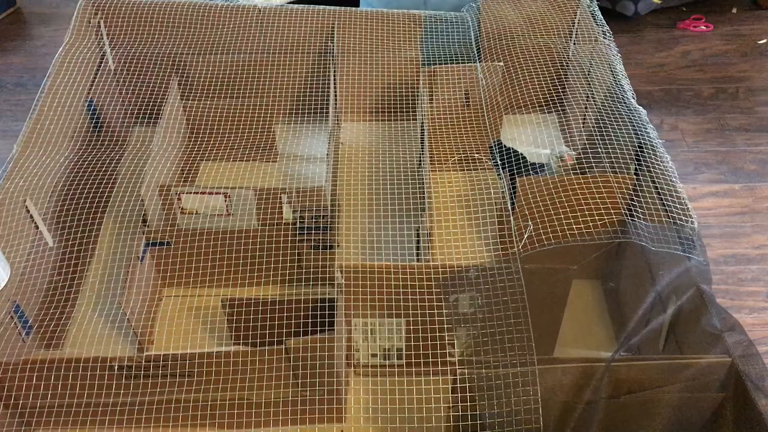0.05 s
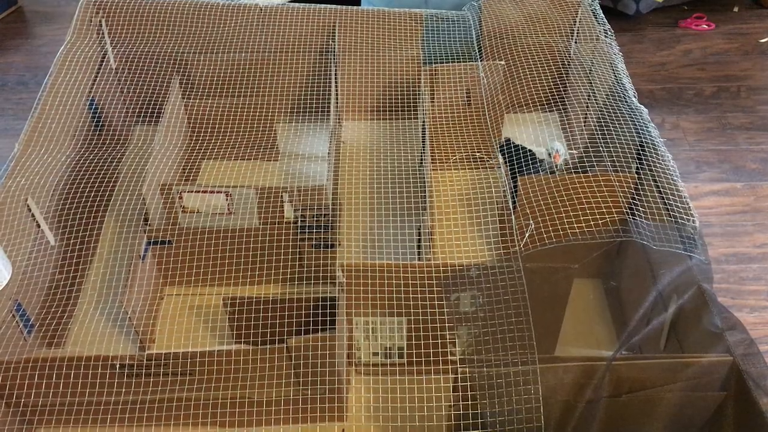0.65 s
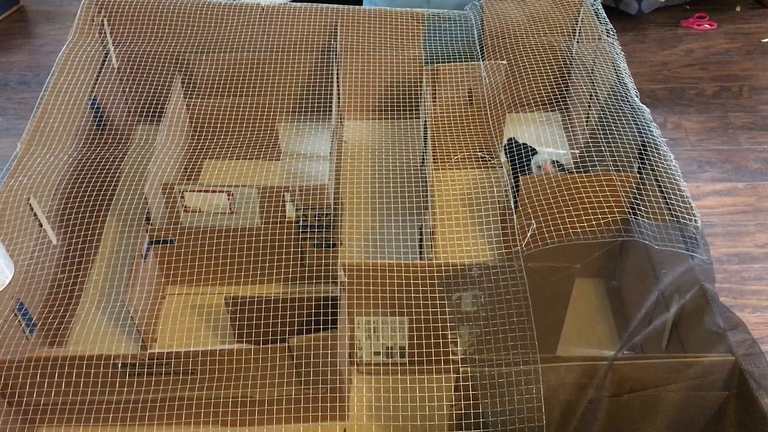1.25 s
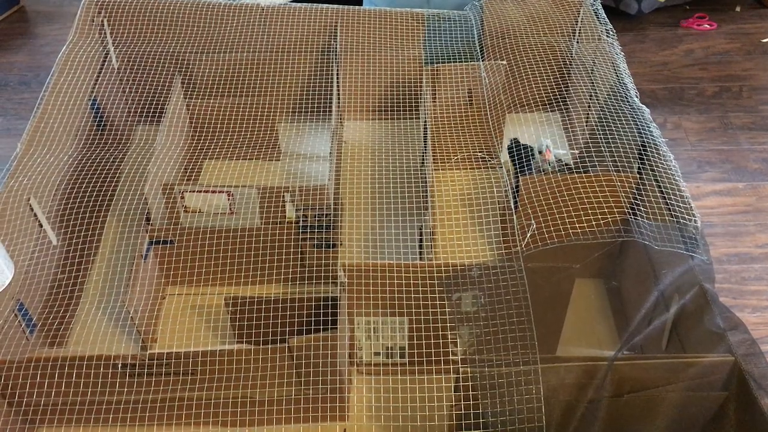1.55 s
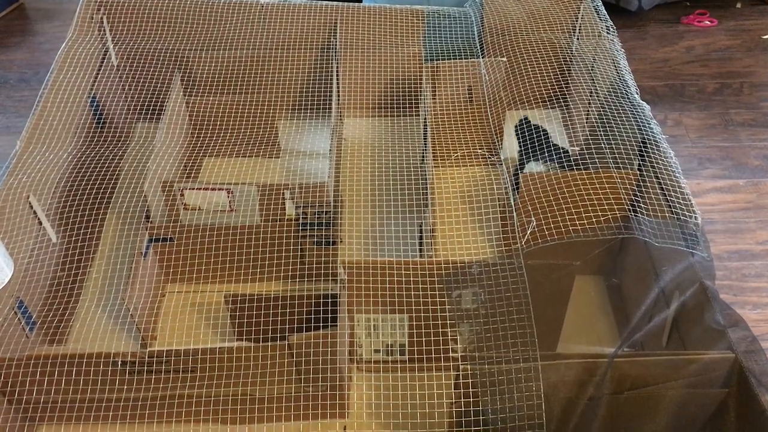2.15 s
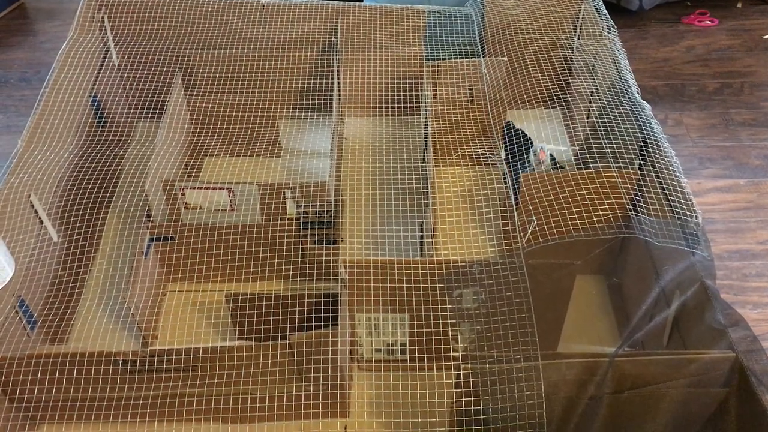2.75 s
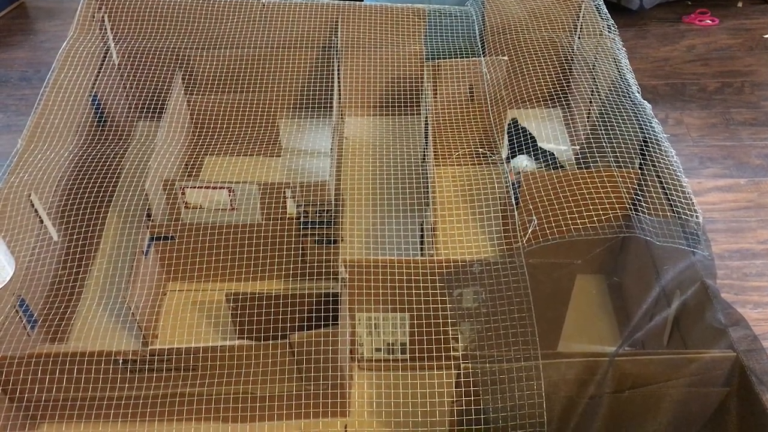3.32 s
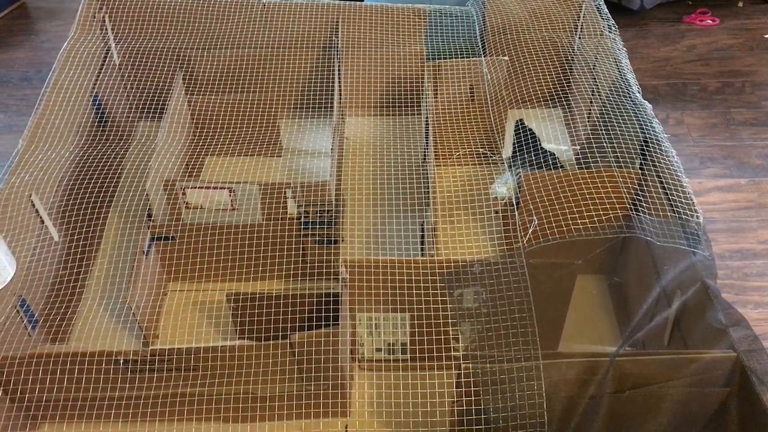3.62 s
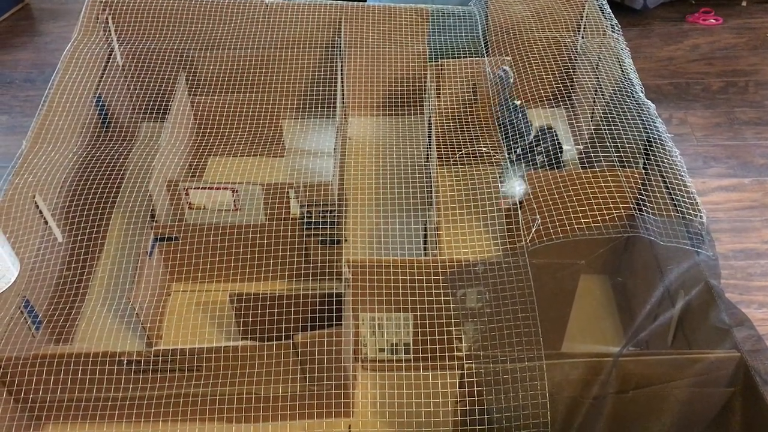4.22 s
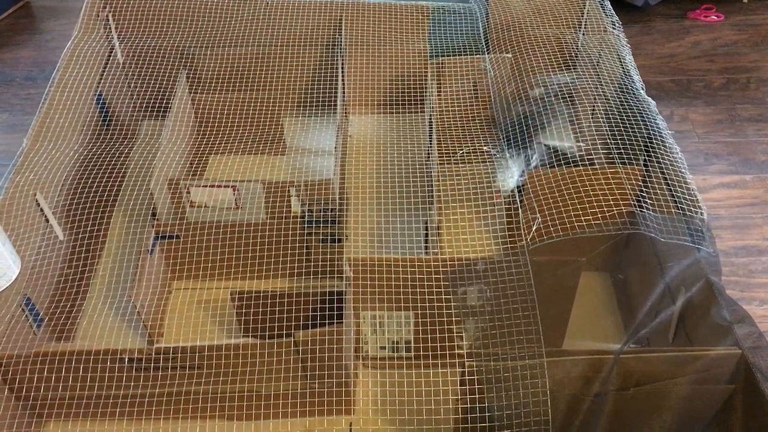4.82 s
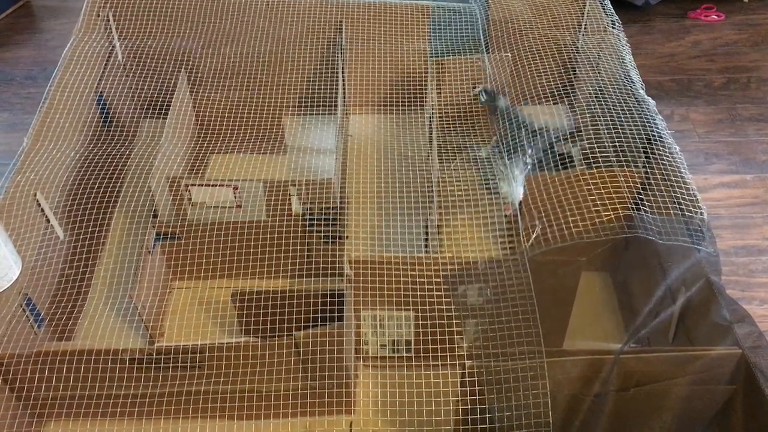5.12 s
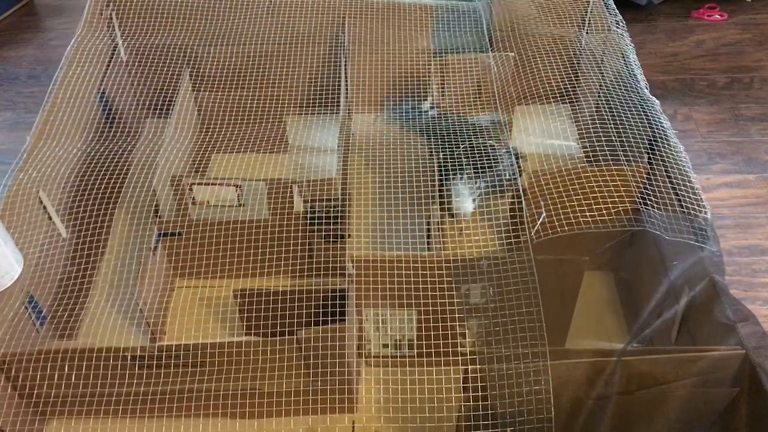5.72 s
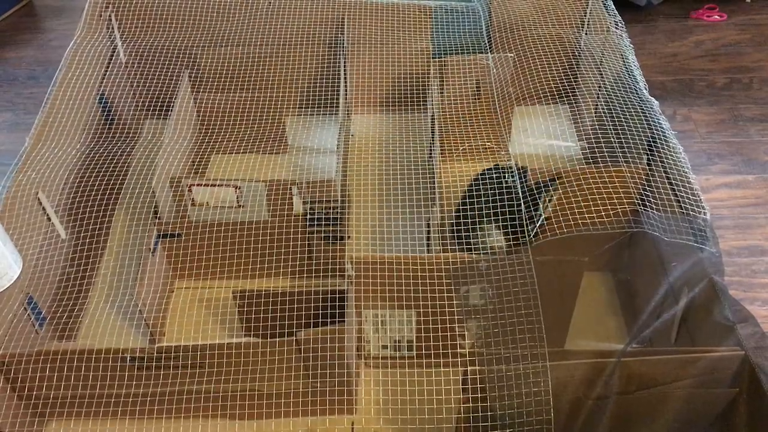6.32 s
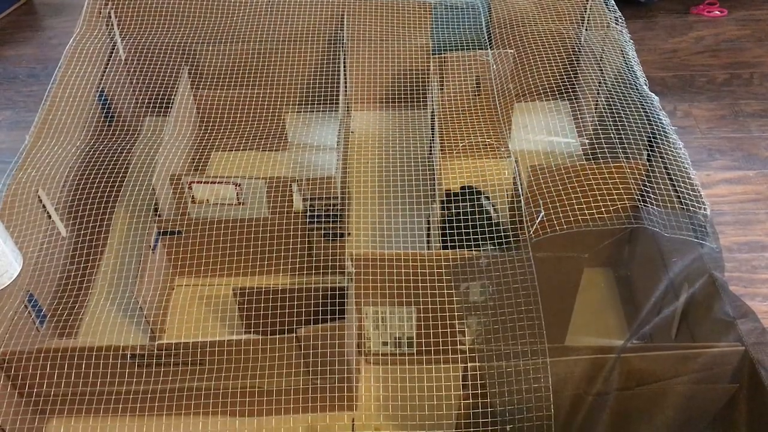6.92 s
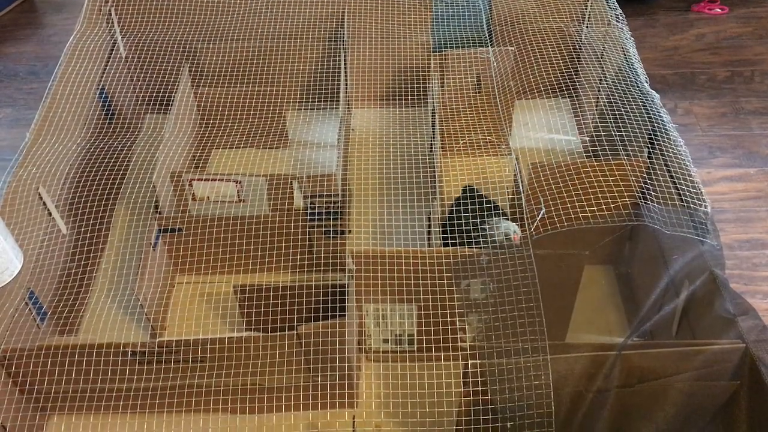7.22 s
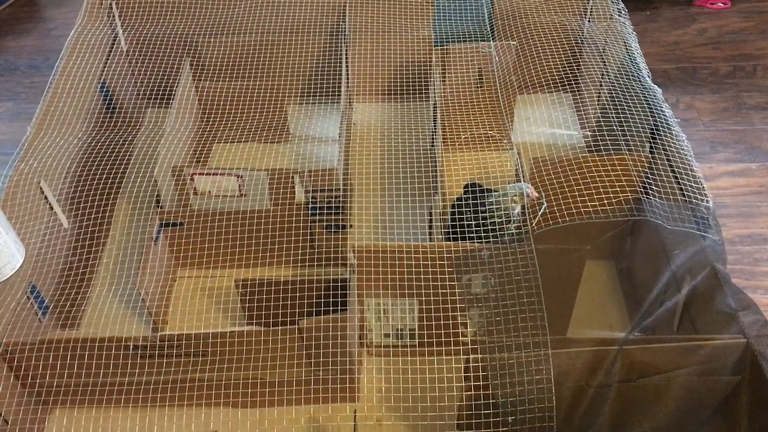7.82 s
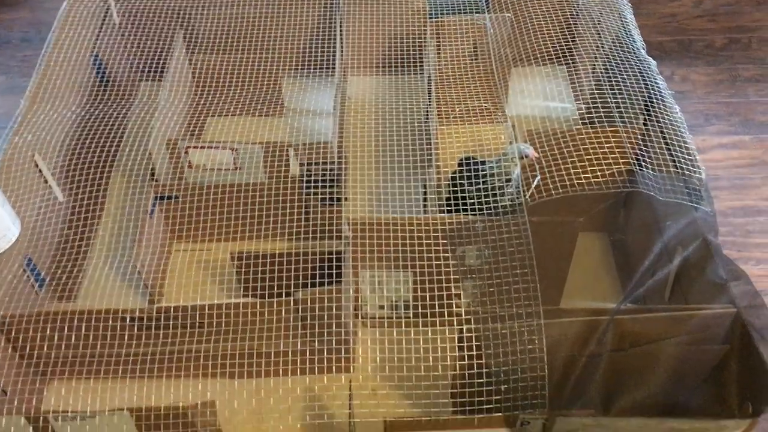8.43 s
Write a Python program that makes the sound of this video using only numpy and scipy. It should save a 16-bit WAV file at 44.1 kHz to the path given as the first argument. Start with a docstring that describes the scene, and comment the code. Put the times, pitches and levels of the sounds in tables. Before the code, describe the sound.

Light claw taps and faint peeps in a cardboard maze give way to a burst of wing flapping and hollow thumps.

```python
"""A young chicken steps about a cardboard maze on the floor of a quiet room, peeping softly. Claws tick, toes
scuff, feet thud and ring the panels. From 4.3 s it flaps over a wall: wings shove air, strike and brush the
cardboard. It lands and folds its feathers by 7 s. At 7.6 s a last faint scuff sounds near 1.9 kHz, with a brief
thin high tone. A last soft step follows. Steady room rumble and hiss lie under it all."""
import sys
import numpy as np
from scipy import signal
from scipy.fft import rfft, irfft, next_fast_len
from scipy.io import wavfile
from scipy.ndimage import uniform_filter1d, map_coordinates

SR = 44100
rng = np.random.default_rng(int(sys.argv[2]) if len(sys.argv) > 2 else 0)


def master(y):
    """Save y as 16-bit WAV."""
    cut = np.clip(np.atleast_2d(y).T, -1, 1)
    pcm = np.round(cut * 32767)  # scale
    wavfile.write(sys.argv[1], SR, pcm.astype(np.int16))


N = 373086
TIME_S = np.arange(N) / SR

# Table levels are relative, ahead of the mix gains.
# wing strokes on the walls: (start [s], length [s], feather hiss [dB], rub [dB], panel shake [dB])
WING_STROKES = [(4.267, .17, -64.5, -72, -60.5), (4.49, 0.13, -54.5, -54.5, -55.5),
                (4.65, 0.11, -39.5, -41, -38.5), (4.825, 0.083, -41.5, -38, -36.5),
                (4.926, 0.15, -38.5, -38.5, -32.5), (5.165, 0.033, -42.5, -39, -43),
                (5.255, 0.04, -45, -38.5, -36), (5.395, .08, -43, -40.5, -34),
                (5.514, 0.16, -38.5, -39, -30.5), (5.84, .095, -40, -39, -35),
                (5.974, 0.028, -57, -52, -39.5), (6.061, 0.066, -45.5, -49, -49),
                (6.137, 0.067, -47, -70, -54), (6.272, .11, -58.5, -74, -58.5),
                (6.402, 0.037, -61, -74, -47), (6.57, 0.28, -70.5, -76.5, -81)]
# wing drive on the air: (time [s], level [dB])
WING_EFFORT = [(4.4, -72), (4.72, -48), (5.21, -38), (5.33, -44), (5.77, -40), (5.85, -52), (5.92, -43),
               (6.6, -71.5)]
# feet, body and wings striking a panel:
# (time [s], panel pitch [Hz], touch thud [dB], settling thud [dB], knock [dB], knock centre [Hz])
PANEL_BLOWS = [(0.823, 172, -49, -42.5, -50, 1140), (.96, 227, -60, -64, -65, 600),
               (1.538, 201.4, -51.5, -57.5, -52.5, 1120), (1.564, 86, -59, -50, -75, 890),
               (2.089, 190, -58.5, -56.5, -80, 1000), (2.334, 173, -68, -61.5, -45.5, 1040),
               (2.414, 171, -62, -36.5, -55, 694), (2.429, 71.5, -54, -45, -71, 500),
               (2.478, 164, -53, -59, -50, 1330), (2.626, 190, -58, -69, -54.5, 880),
               (2.655, 189, -62, -72, -55.5, 1120), (3.281, 176, -51.5, -53.5, -55, 800),
               (3.29, 91, -62, -47.5, -60, 450), (4.054, 173, -31.5, -31.5, -38.5, 904),
               (4.122, 188.6, -42, -44, -46, 1220), (4.389, 171, -55, -47.5, -53.5, 720),
               (4.454, 185, -57, -49.5, -40, 680), (4.635, 172, -30, -41, -23, 1220),
               (4.646, 295, -40, -40, -27, 1150), (4.722, 156, -47.5, -38, -30.5, 716),
               (4.816, 137.7, -42, -50, -36, 730), (4.873, 195, -39, -45, -39, 583),
               (4.951, 161, -30, -38, -35, 617), (5.005, 150, -31, -40, -35.5, 880),
               (5.04, 198, -47, -36.5, -41, 796), (5.1, 164, -37, -31, -37, 794),
               (5.182, 136.8, -41, -43, -45, 890), (5.28, 169, -54, -25, -56, 506),
               (5.42, 166, -39, -29.5, -41, 684), (5.558, 179, -31.5, -36, -34, 647),
               (5.579, 180, -32, -38, -34, 600), (5.63, 170.5, -36, -28, -33.5, 614),
               (5.66, 161, -45, -30.5, -60, 800), (5.888, 201, -33.5, -30.5, -36.5, 900),
               (5.989, 192.7, -32.5, -39.5, -35, 650), (6.086, 162, -46, -46, -41.5, 1060),
               (6.163, 159, -42, -56, -56, 500), (6.422, 192.4, -46.5, -47.5, -51, 1080),
               (6.954, 159.4, -58.5, -53, -67, 1180), (6.965, 79.2, -65, -55, -73, 600),
               (8.165, 150, -65, -73, -71, 1400)]
# cardboard modes: (mean frequency [Hz], level [dB], t60 [s])
PANEL_MODES = [(318, -27, 0.42), (557, -19.5, .25), (670.5, -6, 0.13), (903, -9, 0.043), (1080, -11, 0.098),
               (1195, 5, 0.078), (1277, 2.5, 0.046), (1705, -21.5, 0.13), (1910, -22.5, 0.23)]
# claw and quill tips on cardboard: (time [s], level [dB], tilt [dB/octave])
TIP_TICKS = [(.093, -66.5, 1), (.822, -51.5, -1), (1.031, -68, 2), (1.375, -67, 2), (1.539, -58, 0),
             (1.585, -59.5, 3), (1.92, -71, 2), (2.089, -54, 3.5), (2.333, -41.5, 0), (2.393, -45.5, 2),
             (2.421, -43.5, 1.5), (2.625, -54, -2.5), (2.662, -57.5, -2), (2.915, -63.5, -1),
             (3.089, -64, -0.5), (3.156, -62, 0), (3.304, -64.5, -0.5), (3.721, -61.5, -.5),
             (3.778, -56, 1.5), (4.057, -47.5, 1.5), (4.083, -43.5, -1.5), (4.122, -50.5, 6.5),
             (4.163, -58, 5), (4.39, -54, -1), (4.454, -42.5, -1.5), (4.486, -47.5, 5.5), (4.63, -29, -1.5),
             (4.698, -34.5, -2.5), (4.768, -42.5, 5), (4.817, -38, 6.5), (4.872, -31, 6.5),
             (4.943, -31.5, 5.5), (5.008, -33.5, 4.5), (5.035, -29, 6), (5.181, -32.5, 5),
             (5.421, -37.5, 5.5), (5.555, -37.5, 0.5), (5.639, -35, 0), (5.777, -45, -2),
             (5.812, -42.5, -2.5), (5.838, -38.5, -0.5), (5.96, -42, -3), (5.981, -41, 6), (6.059, -46, .5),
             (6.425, -53.5, 9), (6.836, -60, 5), (6.956, -55.5, 2.5)]
# toe and feather slides; last two rows, near 7.6 s: a last faint scuff, a thin high tone: # (start [s], length
# [s], level [dB], centre [Hz], half-width [octaves])
NOISE_BANDS = [(0.614, .045, -77.5, 4500, 0.081), (0.692, 0.091, -67.5, 4620, 0.19),
               (0.768, 0.076, -58.5, 4600, 0.27), (0.829, 0.079, -50.5, 3240, 0.77),
               (0.944, 0.62, -72, 2370, 1.9), (2.097, 0.16, -67.5, 4970, 4.2),
               (2.34, .074, -51.5, 2180, 1.1), (2.38, 0.06, -45, 3940, 0.81),
               (2.436, 0.11, -54, 3280, 0.94), (2.628, .047, -60, 8300, .3), (2.727, 0.078, -67, 5020, 1.4),
               (3.046, 0.28, -70.5, 3440, 5.3), (3.77, 0.38, -61, 3000, 3.6),
               (3.869, .22, -63.5, 1500, 1.7), (3.93, .03, -50, 8000, 2), (4.056, .087, -45, 1250, 1.25),
               (4.057, 0.06, -52, 8350, 0.21), (6.666, 0.086, -66, 6030, 1.1),
               (6.791, 0.086, -70.5, 1780, 1.3), (7.6, 0.75, -81.5, 1900, 0.65),
               (7.64, .12, -82.5, 7220, .08)]
# calls: (start [s], length [s], level [dB], start pitch [Hz], turn pitch [Hz], end pitch [Hz],
# lower voice [dB], husk [dB], swell [dB])
PEEP_CALLS = [(0.04, 0.08, -61.5, 3180, 2774, 2253, -24, -9, 13),
              (0.286, 0.14, -59.5, 2440, 3310, 2064, -12, -4, 4.5),
              (1.214, 0.096, -59, 3540, 3150, 2230, -34, -14, 8),
              (1.451, .085, -62.5, 3800, 3520, 2446, -11, -2, 12),
              (3.903, 0.086, -56.5, 3690, 3390, 2660, -9, -14, -15)]
# feather vanes brushing: (frequency [Hz], level [dB])
HISS_SPECTRUM = [(600, -26.5), (1500, -3.5), (2300, 2), (2800, -4), (3800, 3), (5200, -1.5), (7000, -0.5),
                 (9400, -1), (10400, -10.5), (12000, -2.5), (15500, -14.5)]
# rubbed wall: (frequency [Hz], level [dB])
RUB_SPECTRUM = [(150, -15), (400, 0.5), (600, 2.5), (850, -0.5), (1250, 0.5), (1550, -1), (2000, -1),
                (3000, -7.5), (6000, -20)]
# shaken wall: (frequency [Hz], level [dB])
SHAKE_SPECTRUM = [(30, -43), (80, -3), (125, -9.5), (170, 1), (220, -2.5), (300, -6.5), (390, -7),
                  (550, -25.5), (1200, -34.5), (4000, -60)]
# air shoved by the wings: (frequency [Hz], level [dB])
GUST_SPECTRUM = [(10, -32.5), (28, -19.5), (38, -9.5), (47, 2), (60, -4.5), (75, -5.5), (105, -8),
                 (180, -29), (600, -62), (2000, -99)]
# struck cardboard: (frequency [Hz], level [dB])
KNOCK_SPECTRUM = [(60, -5), (200, -7.5), (400, 8.5), (800, -7), (1250, -6.5), (1600, -14), (2500, -12.5),
                  (5000, -26), (15000, -55)]
# boom of the whole box: (frequency [Hz], level [dB])
BOOM_SPECTRUM = [(20, -29.5), (48, -18.5), (65, 2.5), (82, 8), (110, -8.5), (160, -16), (400, -46),
                 (2000, -71)]
# snap of a tip: (frequency [Hz], level [dB])
TICK_SPECTRUM = [(100, -32.5), (700, 4.5), (1500, 3), (2700, -1), (3800, 3), (5200, -4.5), (8200, -2),
                 (10500, -8.5), (15500, -16.5)]
# room rumble and hiss: (frequency [Hz], level [dB])
ROOM_TONE_SPECTRUM = [(10, -38.5), (22, -22.5), (32, -9), (48, -0.5), (80, 2), (129, -6.5), (240, -10.5),
                      (372, -13), (500, -21.5), (1000, -27), (1580, -29.5), (2300, -28.5), (2700, -34),
                      (3960, -32), (4810, -35), (9300, -37.5), (10400, -40), (15500, -39)]
# room decay: (frequency [Hz], t60 [s])
ROOM_T60 = [(100, 0.58), (260, 0.27), (700, 0.49), (1840, 0.42), (4850, 0.31), (14000, 0.22)]


def wings(flutter_db=2, quill_db=-7, quills_per_s=70, quill_t60_s=0.0067, air_db=3, gust_db=2):
    """Feathers rake the walls, which rasp and shake; quills crackle; flapping shoves air."""
    _, _, hiss_db, rub_db, shake_db = np.transpose(WING_STROKES)
    pressure = amp(flutter_db * wander(N, 90))  # feathers catch and let go
    vanes = unit(colour(pressure * grains(N, 2500, 3.8, 0.95), HISS_SPECTRUM))
    t = np.arange(SR // 50) / SR
    quills = np.zeros(N)
    for _ in range(10):  # each quill has its own snap
        catches = grains(N, quills_per_s / 10, 2.7, 0)
        snap = colour(rng.standard_normal(len(t)) * amp(-60 * t / quill_t60_s), TICK_SPECTRUM)
        quills += signal.oaconvolve(catches, snap)[:N]
    hiss = unit(vanes + amp(quill_db) * unit(quills))
    rub = unit(colour(pressure * grains(N, 500, 2.1, 0.32), RUB_SPECTRUM))
    shake = unit(colour(grains(N, 300, 1.8, 0.49), SHAKE_SPECTRUM))
    effort_db = np.interp(TIME_S, *np.transpose(WING_EFFORT), left=-130, right=-130)
    air_gain = amp(air_db + effort_db + gust_db * wander(N, 14))
    air = unit(colour(rng.standard_normal(N), GUST_SPECTRUM))
    return (hiss * stroke_gain(hiss_db, fall_db_per_s=135)
            + rub * stroke_gain(rub_db, fall_db_per_s=153.5)
            + shake * stroke_gain(shake_db, fall_db_per_s=113)
            + air * air_gain)


def stroke_gain(levels_db, fall_db_per_s, attack_s=0.028):
    """A stroke swells, holds while the wing drags, then dies away; strokes add in power."""
    power = np.zeros(N)
    for (start_s, length_s, *_), db in zip(WING_STROKES, levels_db):
        attack = np.clip((TIME_S - start_s) / attack_s, 0, 1)
        released_s = np.clip(TIME_S - start_s - length_s, 0, 1)
        power += (attack * amp(db - fall_db_per_s * released_s)) ** 2
    return np.sqrt(power)


def blows(settle_s=0.016, upper_ratio=1.75):
    """The touch knocks and rings a panel's upper mode; the weight follows and rings the lowest."""
    out, t = np.zeros(N), np.arange(SR // 3) / SR
    for s, panel_hz, touch_db, settle_db, knock_db, knock_hz in PANEL_BLOWS:
        add(out, s, amp(knock_db) * knock(t, knock_hz))
        add(out, s, amp(touch_db) * thud(t, upper_ratio * panel_hz, upper_ratio))
        add(out, s + settle_s, amp(settle_db) * thud(t, panel_hz, upper_ratio))
    return out


def thud(t, hz, upper_ratio, swell_s=0.01, upper_db=-13, flex_octaves=0.49, boom_db=-16, boom_s=0.028):
    """The panel bends around one pitch; the box booms."""
    swell = t / swell_s * np.exp(-t / swell_s)  # corridor air lags a few cycles
    bend = np.sin(2 * np.pi * hz * t) + amp(upper_db) * np.sin(2 * np.pi * upper_ratio * hz * t)
    band_db = lambda f: -10 * np.log10(1 + (np.log2(f / hz) / flex_octaves) ** 4)
    flex = unit(colour(rng.standard_normal(len(t)), KNOCK_SPECTRUM, band_db))
    flex *= amp(-6) * hz / 250  # higher thuds stir more modes
    boom = colour(rng.standard_normal(len(t)) * t * np.exp(-t / boom_s), BOOM_SPECTRUM)
    return unit_hit(swell * (bend + flex)) + amp(boom_db) * unit_hit(boom)


def knock(t, centre_hz, ring_db=-6, rattle_t60_s=0.054, contact_s=0.0012,
          crack_db=-3, crack_s=0.0015, off_centre_db=-11, spot_octaves=0.48):
    """A dent cracks, modes ring, stiff flutes rattle; the struck spot favours one band."""
    spot_db = lambda hz: off_centre_db * (1 - np.exp(-(np.log2(hz / centre_hz) / spot_octaves) ** 2))
    ring = np.zeros(len(t))
    for hz, db, t60_s in PANEL_MODES:
        detuned_hz = hz * (1 + 0.06 * rng.standard_normal())
        ring += amp(db + spot_db(hz) - 60 * t / t60_s) * np.sin(2 * np.pi * detuned_hz * t)
    rattle = colour(rng.standard_normal(len(t)) * amp(-60 * t / rattle_t60_s), KNOCK_SPECTRUM, spot_db)
    crack = t / crack_s * np.exp(-t / crack_s) * np.sin(2 * np.pi * centre_hz * t)
    body = (amp(ring_db) * unit_hit(ring) + unit_hit(rattle)) * (1 - np.exp(-t / contact_s))
    return unit_hit(body + amp(crack_db) * unit_hit(crack))


def ticks(snap_t60_s=0.011, drag_db=-17, drag_t60_s=0.132, bite_s=0.001225):
    """A tip bites in with a snap, then patters as it drags."""
    out, t = np.zeros(N), np.arange(SR // 8) / SR
    decay = amp(-60 * t / snap_t60_s) + amp(drag_db - 60 * t / drag_t60_s)
    envelope = decay * (1 - np.exp(-t / bite_s))
    for s, db, db_per_octave in TIP_TICKS:
        tilt_db = lambda hz: db_per_octave * np.log2(np.maximum(hz, 500) / 4000)
        snap = colour(grains(len(t), 4000, 3.7, 0.95) * envelope, TICK_SPECTRUM, tilt_db)
        add(out, s, amp(db) * unit_hit(snap))
    return out


def scuffs():
    """Grainy noise bands: toe and feather friction, ending in a last faint scuff and thin high tone."""
    out = np.zeros(N)
    for s, length_s, db, centre_hz, octaves in NOISE_BANDS:
        count = round(length_s * SR)
        band_db = lambda hz: -12 * np.log10(1 + (np.log2(hz / centre_hz) / octaves) ** 4)
        band = unit(colour(grains(count, 1500, 5, 0.5), TICK_SPECTRUM, band_db))
        add(out, s, amp(db) * band * signal.windows.tukey(count, 0.6))
    return out


def peeps(turn_share=0.16, sag_exponent=1.7, lower_mid_hz=1360, rasp_depth=0.7):
    """A husky whistle bends quickly, slides down and clears; a weak voice rasps below it."""
    out = np.zeros(N)
    for s, length_s, db, start_hz, turn_hz, end_hz, lower_db, husk_db, swell_db in PEEP_CALLS:
        count = round(length_s * SR)
        progress = np.linspace(0, 1, count)
        hook = np.maximum(1 - progress / turn_share, 0) ** 2
        fall = np.clip((1 - progress) / (1 - turn_share), 0, 1) ** sag_exponent
        phase = wavering_phase(end_hz + (turn_hz - end_hz) * fall + (start_hz - turn_hz) * hook)
        husk = (1.15 - progress) * wander(count, 784) * np.sin(1.08 * phase)  # fuzz above the whistle
        lower = np.sin(wavering_phase(lower_mid_hz * (1.06 - 0.115 * progress)))
        lower *= np.sin(np.pi * progress) * (1 + rasp_depth * wander(count, 440))
        voice = np.sin(phase) + amp(husk_db) * husk + amp(lower_db) * lower
        push = signal.windows.tukey(count, 0.2) * amp(swell_db * progress + 2.1 * wander(count, 150))
        add(out, s, amp(db) * unit(voice * push))
    return out


def wavering_phase(hz):
    """Phase [rad] of a slightly unsteady pitch."""
    return 2 * np.pi * np.cumsum(hz * (1 + 0.02 * wander(len(hz), 700))) / SR


def room(x, walls_db, tail_db, walls_t60_s=0.057, tail_stretch=1):
    """Direct sound, quick echoes between the maze walls, then the room tail."""
    t = np.arange(SR * 3 // 4) / SR
    taps = rng.choice([-1., 1.], len(t)) * (rng.random(len(t)) < 3000 / SR)
    early_taps = taps * (t > 0.002) * amp(-60 * t / walls_t60_s)
    walls = unit(colour(early_taps, [(150, -13.5), (700, 4.5), (15000, -1.5)]))
    late_taps = taps * np.clip((t - 0.012) / 0.016, 0, 1)
    hz, frame_s, bands = signal.stft(late_taps, SR, nperseg=256)
    t60_s = tail_stretch * read(ROOM_T60, hz)[:, None]
    _, tail = signal.istft(bands * amp(-60 * frame_s / t60_s), SR, nperseg=256)
    echoes = (amp(walls_db) * walls + amp(tail_db) * unit(tail[:len(t)])) / np.sqrt(len(t))
    return x + signal.fftconvolve(x, echoes)[:N]


def room_tone(db=-63.5):
    """Faint, steady rumble and hiss."""
    return amp(db) * unit(colour(rng.standard_normal(N), ROOM_TONE_SPECTRUM))


def grains(count, per_s, spread_db, smooth_gain):
    """Tiny impulses of uneven size over smooth noise."""
    size = amp(spread_db * np.minimum(rng.exponential(1, count), 4))
    impulses = size * rng.choice([-1, 1], count) * (rng.random(count) < per_s / SR)
    return unit(unit(impulses) + smooth_gain * rng.standard_normal(count))


def wander(count, per_s):
    """Random drift: straight lines between Gaussian knots."""
    knots = rng.standard_normal(count)
    return map_coordinates(knots, [np.arange(count) * per_s / SR], order=1)


def colour(x, spectrum, extra_db=lambda hz: 0):
    """Minimum-phase filter from a spectrum plus an extra curve."""
    size = 2 * next_fast_len(len(x) // 2 + 2048)
    hz = np.fft.rfftfreq(size, 1 / SR) + 1
    cepstrum = irfft(np.log(amp(read(spectrum, hz) + extra_db(hz))))
    cepstrum[1:size // 2] *= 2
    cepstrum[size // 2 + 1:] = 0
    return irfft(rfft(x, size) * np.exp(rfft(cepstrum)))[:len(x)]


def read(points, hz):
    """Table lookup on a log-frequency axis."""
    knot_hz, value = np.transpose(points)
    return np.interp(np.log(hz + 1), np.log(knot_hz + 1), value)


def amp(db):
    """Decibels to gain."""
    return 10 ** (np.asarray(db) / 20)


def unit(x):
    """Scales to rms 1."""
    return x / np.sqrt(np.mean(x ** 2) + 1e-20)


def unit_hit(x):
    """Scales the loudest 7 ms to rms 1."""
    return x / np.sqrt(uniform_filter1d(x ** 2, size=300).max())


def add(mix, s, sound):
    """Adds a sound to the mix at time s."""
    part = mix[max(round(s * SR), 0):][:len(sound)]
    part += sound[:len(part)]


def scene():
    """The bird in the maze over room tone; mono."""
    background = room_tone()
    mix = room(blows(), walls_db=-2.5, tail_db=-10)
    mix += amp(1.2) * room(ticks(), walls_db=-3, tail_db=-3.5)
    mix += amp(-2.5) * room(scuffs() + wings(), walls_db=-7.5, tail_db=-8.5)
    mix += amp(-4.5) * room(peeps(), walls_db=-2, tail_db=-4.5, walls_t60_s=0.1, tail_stretch=1.03)
    return (mix + background)[None]


def record(dry, cutoff_hz=15900):
    """Steep low-pass."""
    lowpass = signal.firwin(511, cutoff_hz, window=("kaiser", 9), fs=SR)
    return signal.oaconvolve(dry, lowpass[None], "same")


dry = scene()
out = record(dry)
master(out)
```